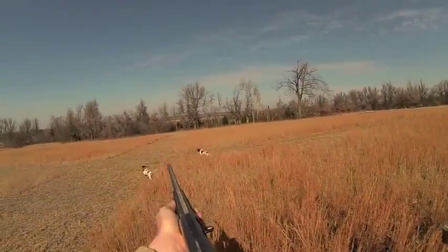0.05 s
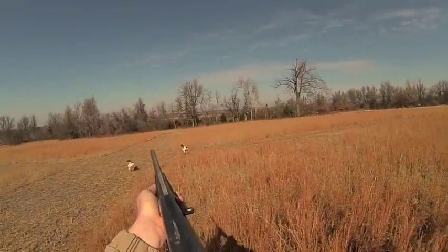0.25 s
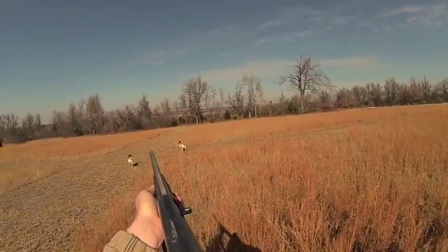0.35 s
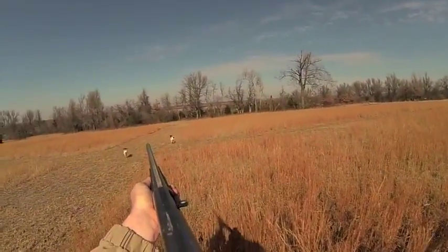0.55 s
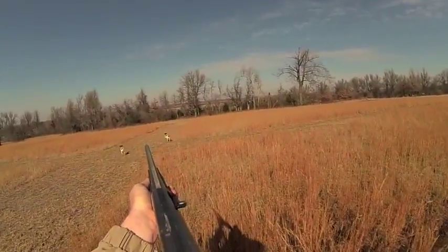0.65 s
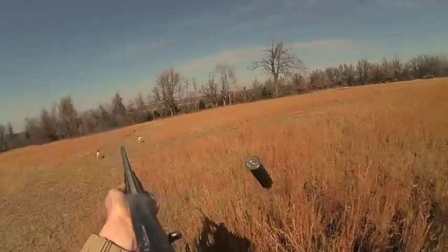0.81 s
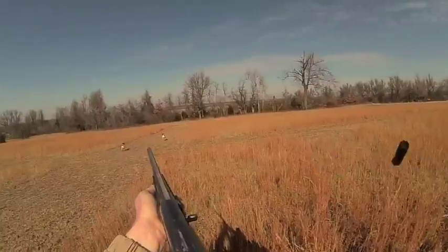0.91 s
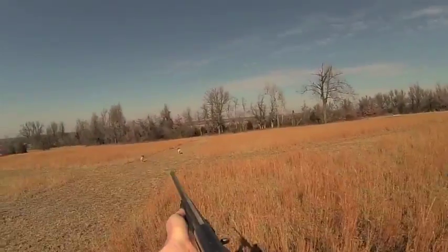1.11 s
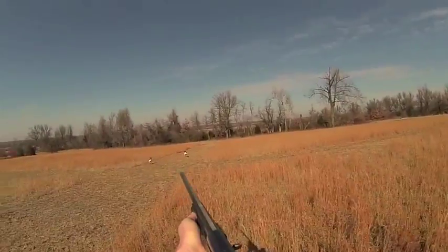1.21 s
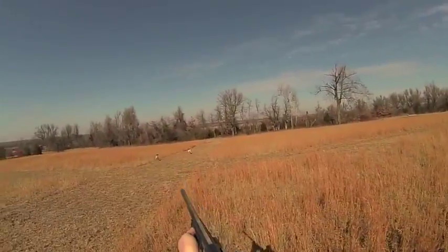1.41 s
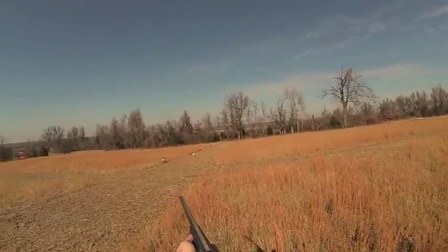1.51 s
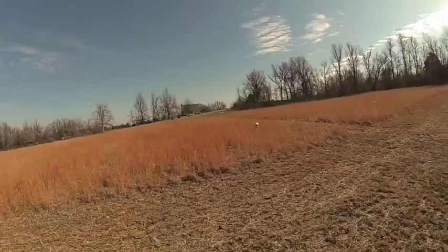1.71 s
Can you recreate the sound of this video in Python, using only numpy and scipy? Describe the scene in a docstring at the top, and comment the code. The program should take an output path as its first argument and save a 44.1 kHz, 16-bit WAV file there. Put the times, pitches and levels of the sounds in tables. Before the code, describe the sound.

A shotgun fires once up close, its action clacks, and crackling echoes return in gusty wind.

```python
"""A self-loading shotgun is fired twice in a windy field, close to a body-worn microphone.
The first shot falls just before the start; a hollow rush follows, and about 0.4 s after the shot the
tree line throws back a long, crackling echo. At 0.75 s the second blast overloads the microphone,
and the gain ducks while the steel action cycles and clacks shut. The rush returns, then the same
trees echo again as gusts buffet the microphone."""
import sys
import numpy as np
from scipy import signal
from scipy.io import wavfile
from scipy.ndimage import uniform_filter1d

SR = 44100
rng = np.random.default_rng(int(sys.argv[2]) if len(sys.argv) > 2 else 0)


def unload_wav(signal):
    """Save mono or channel-first audio to the path in sys.argv[1] as 16-bit WAV at rate SR, clipped to [-1, 1]."""
    wavfile.write(
        sys.argv[1],
        SR,
        np.round(np.clip(np.atleast_2d(signal).T, -1, 1) * 32767).astype(np.int16),
    )


N = 77175
T = np.arange(N) / SR

# Brushes of clothing and grass. Each row: centre in seconds, length in seconds, level in dB.
RUSTLES = [(0.54, 0.14, -53), (1.506, 0.049, -50.5), (1.643, 0.055, -54), (1.696, .015, -52)]
# Spectra of the brushes, the hiss and the wind. Each row: frequency in Hz, relative level in dB.
BRUSH_SPECTRUM = [(500, -6), (5000, 5), (9000, -1), (12000, -6.5), (15000, -13)]
HISS_SPECTRUM = [(100, -18), (1000, -11.5), (5000, -13), (6700, -9), (8500, -4), (12000, -23.5),
                 (16000, -29)]
WIND_SPECTRUM = [(10, 5), (25, -2), (45, 3.5), (80, -5), (140, -17), (220, -9.5), (350, -21.5), (600, -25),
                 (1200, -47), (4000, -63), (16000, -98)]
# Wind on the microphone. Each row: time in seconds, level in dB.
GUSTS = [(0, -39), (.08, -32), (.15, -29.5), (.22, -29), (.36, -34.5), (.45, -27), (.57, -35.5), (.66, -32),
         (.74, -32.5), (.86, -53), (.98, -38), (1.035, -27.5), (1.14, -30.5), (1.28, -23), (1.34, -47),
         (1.41, -26), (1.5, -36.5), (1.75, -35)]
# Hard buffets of wind. Each row: centre in seconds, level in dB, period in seconds.
BUFFETS = [(0.246, -21, 0.02), (0.488, -34, 0.033), (0.559, -21.5, 0.043), (1.291, -15.5, 0.019)]
# A light knock. Each row: start in seconds, peak in dB, frequency in Hz, 60 dB decay time in seconds.
KNOCKS = [(0.101, -26, 2210, 0.012)]
# Envelope of the hollow rush. Each row: seconds after the shot, level in dB.
RUSH_ENVELOPE = [(.1, -60), (.2, -50), (.27, -39), (.32, -42.5), (.345, -27), (.375, -37.5), (.42, -65)]
# Trees that stand out in the echo. Each row: delay in seconds, relative level in dB, smear in seconds.
TREES = [(.4325, -6, 0.0024), (0.4433, 4, 0.0099), (0.457, -3.5, 0.0037), (.4688, 9.5, 0.0038),
         (0.4765, 4.5, 0.0028), (0.491, 3, 0.0021), (0.493, 0.5, 0.0029), (0.519, 0, 0.0036),
         (0.553, -7, 0.006), (0.5759, 2, 0.006), (.666, -9, .003), (.694, -36, 0.0015), (.7095, -1, 0.0019),
         (.721, -8.5, 0.005), (0.741, -5, 0.0018), (0.7868, -1.5, 0.006), (.836, -1.5, 0.006),
         (0.852, -2.5, 0.0013), (0.87, -2, 0.003), (.892, -8.5, 0.002), (0.9133, -6, 0.0016),
         (.929, -17, 0.0028)]
# Diffuse echo of the woods. Each row: seconds after the shot, relative level in dB.
WOODS_ENVELOPE = [(.39, -77.5), (.412, -34.5), (.432, -19), (.45, -19.5), (.485, -22), (.51, -22.5),
                  (.59, -23), (.64, -28), (.74, -30), (.77, -34), (.81, -32.5), (.86, -35), (.98, -31)]
# Echo spectra of trunks, front row and deep woods. Each row: frequency in Hz, relative level in dB.
TRUNK_SPECTRUM = [(30, -1), (220, 3.5), (450, 5.5), (900, 1), (2000, -2.5), (4000, 4), (7000, -17),
                  (16000, -31)]
NEAR_WOODS_SPECTRUM = [(25, 5), (60, -2.5), (220, 2.5), (390, -15.5), (600, -4), (850, 1), (1200, -3.5),
                       (1900, -6), (2700, -16), (3700, -15.5), (6000, -24), (9000, -35), (12000, -57),
                       (16000, -119)]
FAR_WOODS_SPECTRUM = [(25, -11.5), (60, 2), (220, -5), (390, -21), (600, -3), (780, 4.5), (1200, -8),
                      (1900, -6), (2700, -18), (3700, -26), (6000, -31.5), (9000, -57), (12000, -71),
                      (16000, -80)]
# Impacts in the action. Each row: start in seconds, strength in dB, scrape decay time in seconds.
ACTION_CLICKS = [(0.74, -3.5, 0.0014), (0.7439, -4.5, .002), (0.7954, 13, 0.0016), (0.863, 8, 0.0018),
                 (0.8675, 6.5, 0.0048), (0.8849, 10.5, 0.0044), (.8900, 22.5, 0.00033),
                 (0.8915, 24, 0.0023), (0.9375, 2.5, .0018), (1.089, -22.5, 0.0019), (1.573, -18, 0.011)]
# Modes of the receiver. Each row: frequency in Hz, relative level in dB, 60 dB decay time in seconds.
RECEIVER_MODES = [(1432, -3.5, 0.014), (2530, -17.5, 0.075), (3020, -2.5, .02), (3610, -16, 0.025),
                  (4770, -15.5, 0.021), (5240, -8, 0.045), (6600, -14, 0.013), (6900, -12, .012),
                  (7720, -4, .012), (9700, -29, .016)]
# Spectra of the clack, grass scatter and muzzle blast. Each row: frequency in Hz, relative level in dB.
CLACK_SPECTRUM = [(100, -16.5), (800, -23.5), (2400, -9), (3800, -17), (5400, -12.5), (7000, -25),
                  (9400, -20.5), (11000, -33.5), (16000, -44)]
GRASS_SPECTRUM = [(100, -7), (400, 10), (900, 10.5), (1600, 1), (2600, 1.5), (3500, -5), (5300, 1.5),
                  (6800, -7.5), (9000, -4.5), (11000, -14.5), (16000, -23.5)]
BLAST_SPECTRUM = [(30, 16.5), (160, -1), (270, 7), (500, 5), (800, 1.5), (2200, 3), (3200, -1), (5400, 0.5),
                  (8000, -5), (11000, -13), (16000, -65)]
# Scatter from the nearby grass. Each row: seconds after the shot, level in dB.
GRASS_ENVELOPE = [(.008, -7.5), (.03, -11.5), (.07, -16), (.14, -23.5), (.23, -45.5), (.38, -46), (.7, -70),
                  (1, -66.5)]
# The shots. Each row: start in seconds, gain of the echo in dB.
SHOTS = [(-0.225, -1), (0.7466, -1.78)]


def amp(db):
    """Amplitude grows tenfold for every 20 dB."""
    return 10 ** (np.asarray(db) / 20)


def envelope(points):
    """Interpolation in decibels gives exponential growth or decay between rows of (seconds, dB)."""
    return amp(np.interp(T, *np.transpose(points)))


def unit(x):
    """Normalisation to unit energy."""
    return x / np.sqrt(np.sum(x ** 2) + 1e-20)


def add(mix, start_s, sound):
    """Superposition of a sound on the mix; any part before time zero is lost."""
    at = round(start_s * SR)
    sound = sound[max(-at, 0):]
    part = mix[max(at, 0):][:len(sound)]
    part += sound[:len(part)]


def colour(x, spectrum, size=4096):
    """Minimum-phase filtering: a causal response of unit energy with the given spectrum."""
    hz, db = np.transpose(spectrum)
    bin_hz = abs(np.fft.fftfreq(size, 1 / SR))
    log_gain = np.log(amp(np.interp(np.log(bin_hz + 1), np.log(hz), db)))
    response = np.exp(np.conj(signal.hilbert(log_gain)))
    taps = np.fft.ifft(response).real[:size // 2]
    return signal.fftconvolve(x, unit(taps))[:len(x)]


def lowpass(x, hz):
    """A second-order low-pass attenuates the treble above its cutoff."""
    return signal.lfilter(*signal.butter(2, min(hz, SR / 2 - 1), fs=SR), x)


def burst(decay_s, size=2048):
    """Exponential decay of a cluster of tiny impacts, with unit energy."""
    return unit(rng.choice([-1., 1.], size) * np.exp(-T[:size] / decay_s))


def clumped_noise(spread_db, clump_samples):
    """Random amplitude modulation gathers white noise into clumps."""
    clumps = uniform_filter1d(rng.standard_normal(N), clump_samples) * np.sqrt(clump_samples)
    return rng.standard_normal(N) * amp(spread_db * clumps)


def rustle(hiss_db=-63.5):
    """Friction of clothing and grass gives soft swells of noise over a faint, steady hiss."""
    level = sum(amp(db) * np.exp(-(2 * (T - s) / length) ** 2) for s, length, db in RUSTLES)
    brushes = colour(level * rng.standard_normal(N), BRUSH_SPECTRUM)
    return brushes + amp(hiss_db) * colour(rng.standard_normal(N), HISS_SPECTRUM)


def wind():
    """Turbulence at the microphone makes a lumpy rumble that follows the gusts."""
    rumble = colour(clumped_noise(spread_db=2, clump_samples=1300), WIND_SPECTRUM)
    return envelope(GUSTS) * unit(rumble) * np.sqrt(N)


def buffets():
    """Each hard buffet is one swing of air pressure: compression, then rarefaction."""
    out = np.zeros(N)
    for centre_s, db, period_s in BUFFETS:
        cycles = (T - centre_s) / period_s
        out -= amp(db) * np.exp(-cycles ** 2) * np.sin(2 * np.pi * cycles)
    return out


def damped_mode(hz, t60):
    """Free vibration of one mode, which loses 60 dB in t60 seconds."""
    return np.exp(-np.log(1000) * T / t60) * np.sin(2 * np.pi * hz * T)


def knocks(rattle_s=0.0023):
    """A brief rattle excites the resonance of a small, hard object."""
    out = np.zeros(N)
    for start_s, db, hz, t60 in KNOCKS:
        knock = signal.fftconvolve(burst(rattle_s), damped_mode(hz, t60))
        add(out, start_s, amp(db) * knock / abs(knock).max())
    return out


def rush(reference_hz=454.7, reference_s=.25, fall_per_s=11, width_hz=223):
    """Narrow-band noise on a falling carrier is heard as a hollow, sinking rush after each shot."""
    out = np.zeros(N)
    pole = np.exp(-np.pi * width_hz / SR)
    glide_s = np.minimum(T, RUSH_ENVELOPE[-1][0]) - reference_s
    hz = reference_hz * np.exp(-fall_per_s * glide_s)
    carrier = np.exp(2j * np.pi * np.cumsum(hz) / SR)
    for shot_s, _ in SHOTS:
        noise = rng.standard_normal(N) + 1j * rng.standard_normal(N)
        waver = signal.lfilter([1], [1, -2 * pole, pole * pole], noise)
        band = unit((waver * carrier).real) * np.sqrt(N)
        add(out, shot_s, envelope(RUSH_ENVELOPE) * band)
    return out


def branches():
    """Diffuse scattering: countless small reflections arrive in clumps."""
    return unit(clumped_noise(spread_db=3, clump_samples=130)) * np.sqrt(N)


def trunks(front_s, front_cutoff_hz=4560, dulling_per_s=3.6):
    """Discrete reflections from single trunks lose more treble the longer their path."""
    out = np.zeros(N)
    for delay_s, db, smear_s in TREES:
        reflection = burst(smear_s)
        reflection[0] = -.4  # a sharp front leads the smear
        cutoff_hz = front_cutoff_hz * np.exp(-dulling_per_s * (delay_s - front_s))
        add(out, delay_s, amp(db) * lowpass(unit(reflection), cutoff_hz))
    return colour(out, TRUNK_SPECTRUM)


def woods_echo(front_s=0.52, deep_s=0.69, air_change=0.57, fade_db_per_s=60):
    """Reflection from the same trees repeats the echo; the air alters part of the diffuse scatter."""
    out = np.zeros(N)
    trunk_paths = trunks(front_s)
    steady_paths = np.sqrt(1 - air_change ** 2) * branches()
    tail_s = np.maximum(T - WOODS_ENVELOPE[-1][0], 0)
    level = envelope(WOODS_ENVELOPE) * amp(-fade_db_per_s * tail_s)
    depth = np.clip((T - front_s) / (deep_s - front_s), 0, 1)  # later arrivals come from deeper in
    for shot_s, db in SHOTS:
        paths = trunk_paths + level * (steady_paths + air_change * branches())
        near = colour(paths * (1 - depth), NEAR_WOODS_SPECTRUM)
        far = colour(paths * depth, FAR_WOODS_SPECTRUM)
        add(out, shot_s, amp(db) * (near + far))
    return out


def gun_action(ring_db=-6):
    """Impact excitation: steel parts scrape and strike, ringing the modes of the receiver."""
    blows = np.zeros(N)
    for start_s, db, scrape_s in ACTION_CLICKS:
        add(blows, start_s, amp(db) * burst(scrape_s))
    ring = unit(sum(amp(db) * damped_mode(hz, t60) for hz, db, t60 in RECEIVER_MODES))
    return colour(blows, CLACK_SPECTRUM) + amp(ring_db) * signal.fftconvolve(blows, ring)[:N]


def gas_push(rise_s=0.00026, fall_s=0.0048):
    """Expanding muzzle gas makes a one-sided pulse of pressure."""
    return np.exp(-T / fall_s) * (1 - np.exp(-T / rise_s))


def muzzle_blast(blast_db=1.5, rise_s=0.0064, hold_until_s=0.011, fall_s=0.0012,
                 push_db=6.5, push_delay_s=.0155):
    """Sudden release of pressure radiates a blast; a push of gas and scatter from the grass follow."""
    out = np.zeros(N)
    shape = np.minimum(T / rise_s, 1) * np.exp(-np.maximum(T - hold_until_s, 0) / fall_s)
    for shot_s, _ in SHOTS:
        add(out, shot_s, amp(blast_db) * colour(shape * rng.standard_normal(N), BLAST_SPECTRUM))
        add(out, shot_s + push_delay_s, amp(push_db) * gas_push())
        add(out, shot_s, colour(envelope(GRASS_ENVELOPE) * rng.standard_normal(N), GRASS_SPECTRUM))
    return out


def scene():
    """Gun, echo and weather superpose at one microphone."""
    pressure = muzzle_blast() + rush() + woods_echo() + gun_action() + knocks()
    return (pressure + wind() + buffets() + rustle())[None]


def ducking_gain(x, threshold_db=-6, slope=11, max_cut_db=20.5,
                 attack_s=0.009, hold_s=0.11, recover_db_per_s=165, window=350):
    """Automatic gain control: the gain drops with a lag as the level peaks, holds, then recovers."""
    power = signal.lfilter(np.ones(window) / window, [1], x ** 2)
    level_db = 10 * np.log10(abs(power) + 1e-12)
    demand_db = np.clip(slope * (level_db - threshold_db), 0, max_cut_db)
    deepest_db = np.maximum.accumulate(demand_db)
    last_rise_s = np.maximum.accumulate(T * (np.diff(deepest_db, prepend=0) > 0))
    recovered_db = recover_db_per_s * np.maximum(T - last_rise_s - hold_s, 0)
    cut_db = np.maximum(deepest_db - recovered_db, 0)
    pole = np.exp(-1 / (attack_s * SR))
    return amp(-signal.lfilter([1 - pole], [1, -pole], cut_db))


def overload(x, ceiling=.84):
    """Saturation: the response is linear to near the ceiling and flat above it."""
    return x / (1 + (x / ceiling) ** 12) ** (1 / 12)


def record(dry, mic_top_hz=13600, fade_s=0.059, band_edge_hz=15500):
    """The gain ducks too late, so the blast saturates; a closing fade and a band limit follow."""
    pressure = dry[0]
    clipped = overload(pressure * ducking_gain(pressure))
    faded = lowpass(clipped, mic_top_hz) * np.minimum((T[-1] - T) / fade_s, 1)
    band_limit = signal.firwin(255, band_edge_hz, window=("kaiser", 9), fs=SR)
    return signal.fftconvolve(faded, band_limit, "same")[None]


dry = scene()
out = record(dry)
unload_wav(out)
```